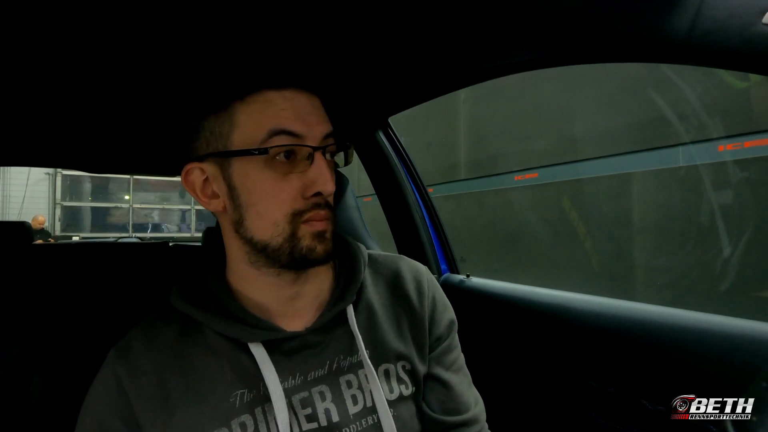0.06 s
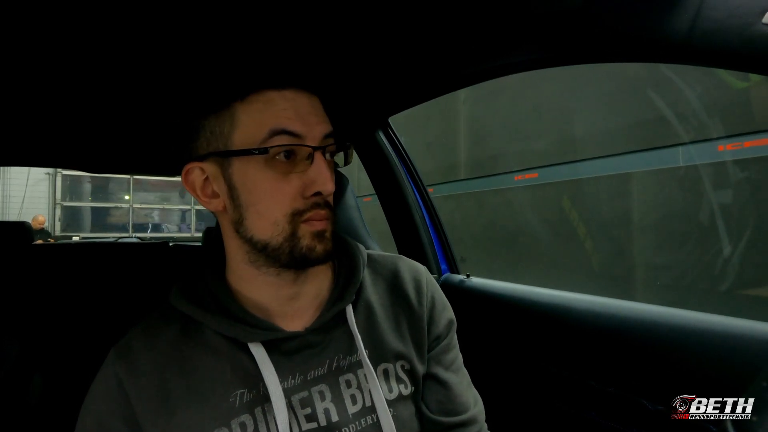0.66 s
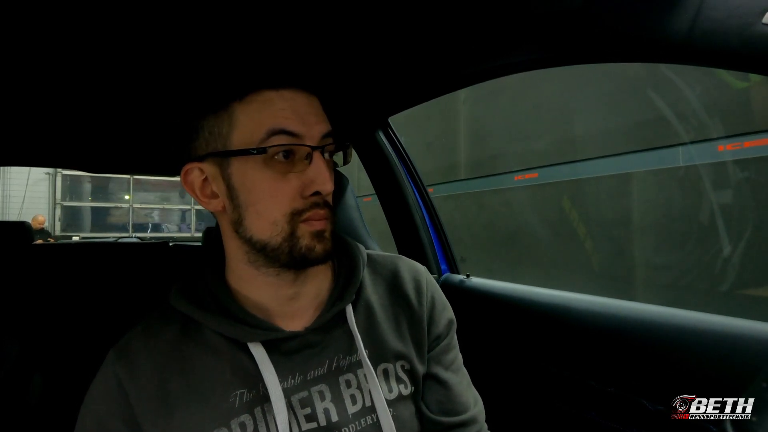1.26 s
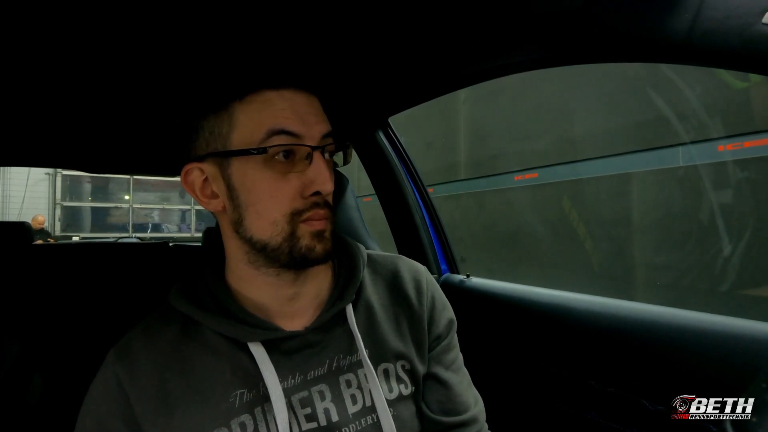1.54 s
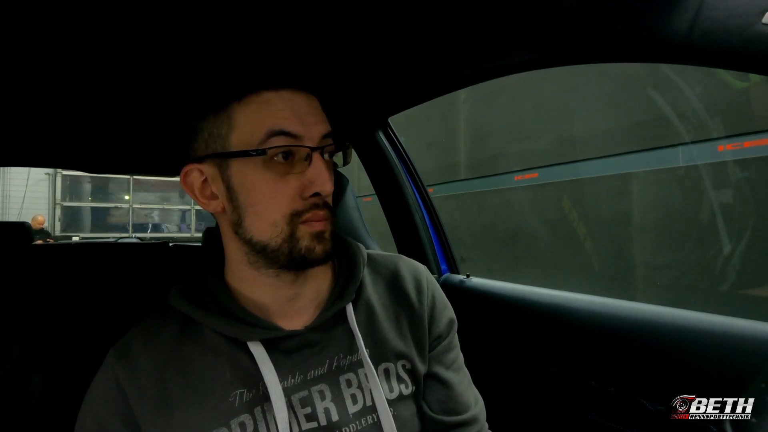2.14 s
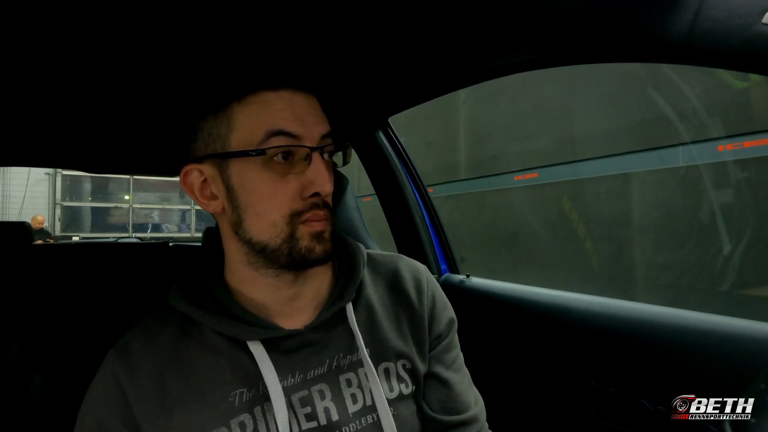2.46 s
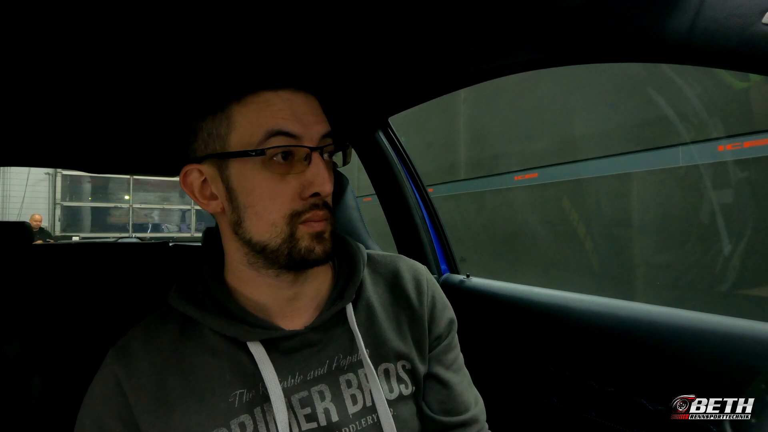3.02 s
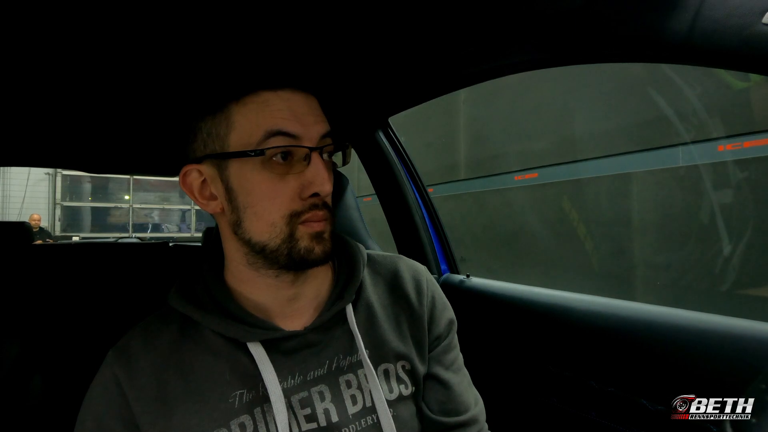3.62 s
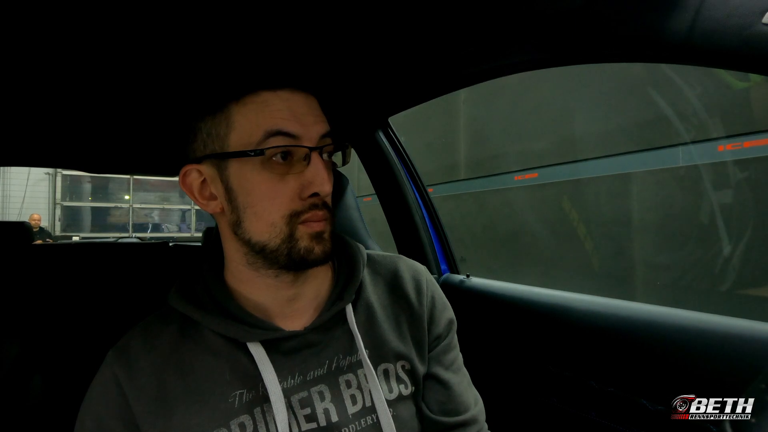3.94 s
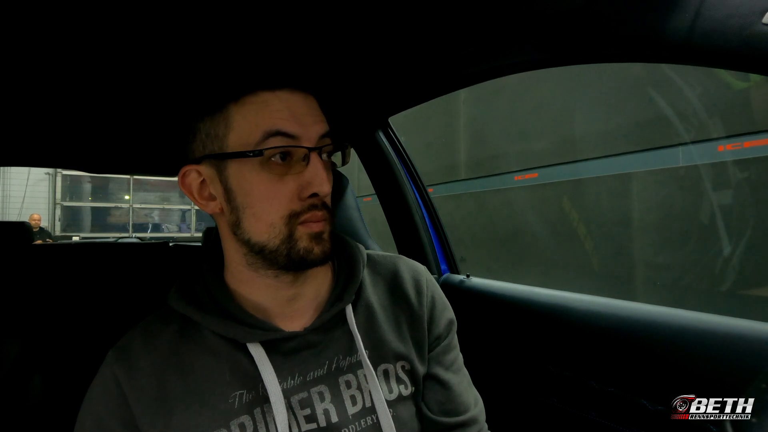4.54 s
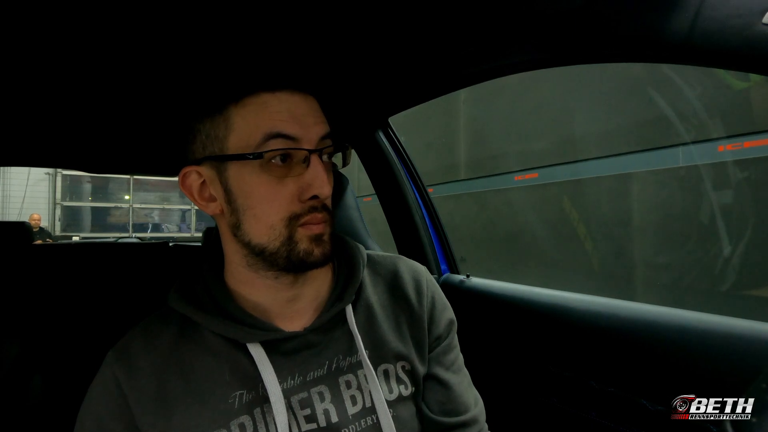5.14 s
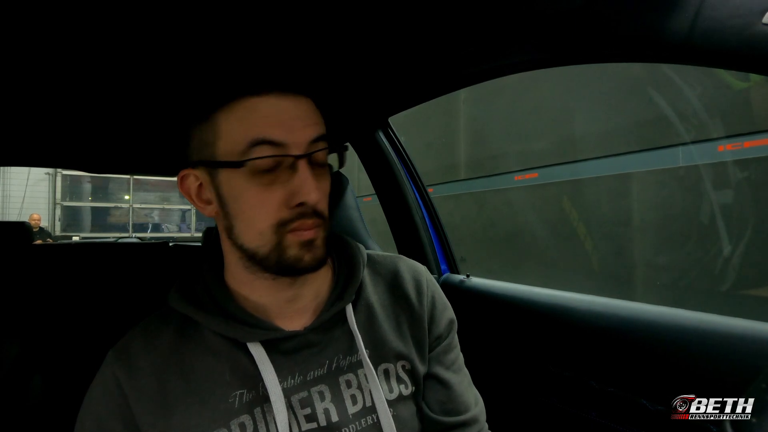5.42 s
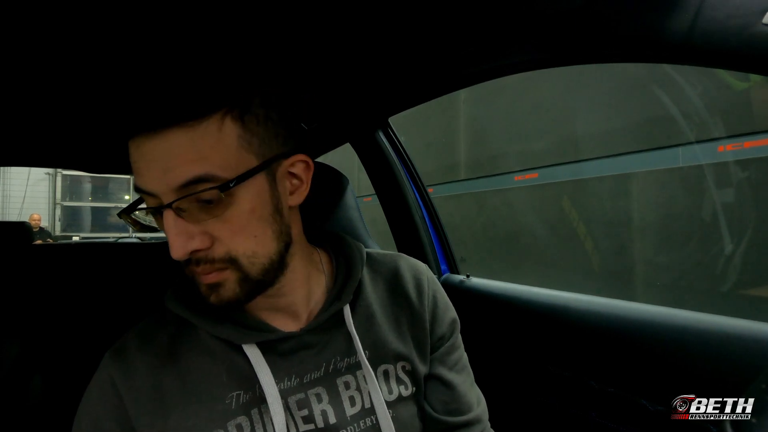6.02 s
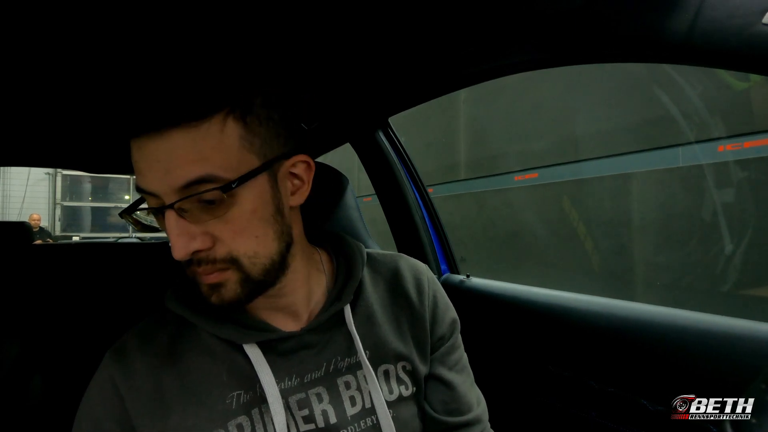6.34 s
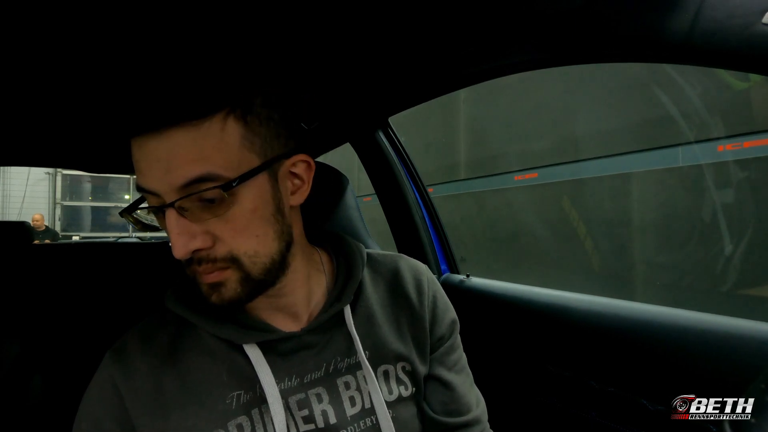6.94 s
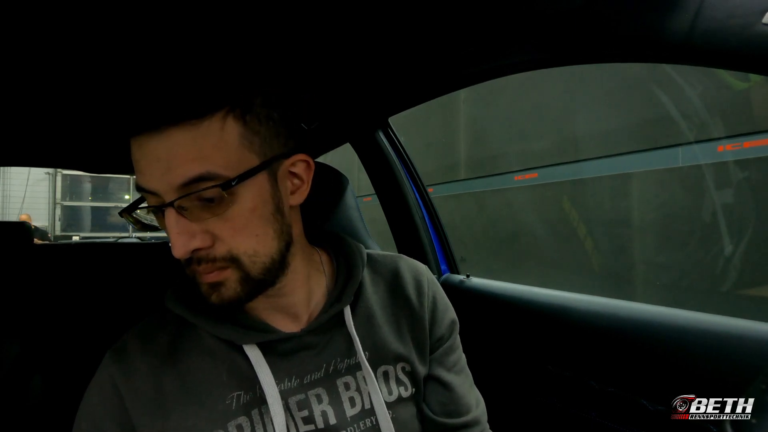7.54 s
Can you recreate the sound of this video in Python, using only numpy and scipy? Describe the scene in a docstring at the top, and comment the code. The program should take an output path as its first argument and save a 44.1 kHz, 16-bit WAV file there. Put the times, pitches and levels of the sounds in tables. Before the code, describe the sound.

A turbocharged six-cylinder car engine runs on a dyno, heard from inside the closed cabin. During the first second and a half its deep drone rises slightly in pitch and settles. It then holds an even speed until about 4.6 seconds, with a thin gear whine, a light mechanical rasp and a low body rumble underneath. From 4.6 seconds the engine pulls under full load, climbing smoothly and ever faster in pitch. The exhaust note grows louder, booming and thinning in turn, with swells around 5.7, 6.2 and 7.1 seconds. The gear whine rises with it and fades after about 6 seconds. Intake hiss and rasp grow a little, with brief surges between 6.6 and 7.5 seconds. The engine is still climbing when the sound ends near 7.8 seconds.

```python
"""Turbo six on a dyno, from the cabin

A turbocharged six-cylinder engine gathers speed, holds for a few seconds, then climbs under full load
with a gear whining along. Its orders (multiples of the engine cycle rate) drop out as they sweep through
the nodes of test cell and closed cabin. The body rumbles throughout; near the top the intake air
hisses harder and a thin metal part buzzes."""
import sys
import numpy as np
from scipy.fft import rfft, irfft, next_fast_len
from scipy.io import wavfile
from scipy.ndimage import uniform_filter1d, minimum_filter1d, map_coordinates

SR = 44100
rng = np.random.default_rng(int(sys.argv[2]) if len(sys.argv) > 2 else 0)


def transcribe(signal):
    """Save signal, clipped to [-1, 1], as a 16-bit WAV file at the path in sys.argv[1]."""
    frames = np.atleast_2d(signal).T
    limited = np.clip(frames, -1, 1)
    pcm = np.round(limited * 32767).astype(np.int16)
    wavfile.write(sys.argv[1], SR, pcm)


N = 342657
TIME = np.arange(N) / SR
COARSE = TIME[::100]  # time grid for slow controls


def amp(db):
    """Decibels to gain."""
    return 10 ** (np.asarray(db) / 20)


def unit(x):
    """Scale to rms 1."""
    return x / np.sqrt(np.mean(np.abs(x) ** 2) + 1e-20)


def fader(points, t=TIME):
    """A level ride through (time_s, level_db) points, in dB at the times t."""
    return np.interp(t, *np.transpose(points))


def fine(slow):
    """A slow control at every sample."""
    return np.interp(TIME, COARSE, slow)


def wobble(rate_hz):
    """A smooth random curve, rate_hz knots a second."""
    return fine(map_coordinates(rng.standard_normal(1024), [COARSE * rate_hz], mode="mirror"))


def scatter(place):
    """A smooth random complex gain of rms about 1, new with each whole step of place."""
    real, imag = (map_coordinates(k, [place], mode="mirror") for k in rng.standard_normal((2, 1024)))
    return (real + 1j * imag) / np.sqrt(2)


def filtered(x, response):
    """x through a frequency response."""
    size = next_fast_len(N + SR // 4)
    return irfft(rfft(x, size) * response(np.fft.rfftfreq(size, 1 / SR)), size)[:N]


def coloured(x, spectrum):
    """x through an EQ of (freq_hz, gain_db) points, at rms 1."""
    hz, db = np.transpose(spectrum)
    return unit(filtered(x, lambda f: amp(np.interp(np.log(f + 1), np.log(hz), db, left=-120, right=-120))))


def resonant(x, modes):
    """x through (pitch_hz, width_hz, gain_db) resonances, at rms 1."""
    def peaks(f):
        return sum(amp(db) / (1 + ((f - hz) / (width / 2)) ** 2) for hz, width, db in modes)
    return unit(filtered(x, peaks))


START_HZ, HELD_HZ, SETTLE_S, SETTLE_SHAPE = 21.2, 25.33, .774, 1.12
RELEASE_S, CLIMB_HZ_PER_S, CLIMB_HZ_PER_S2 = 4.6, 2.62, .457
def speed():
    """Engine cycles (two crank turns) a second: eases up to the held speed, then the dyno lets it climb."""
    climb_s = np.maximum(COARSE - RELEASE_S, 0)
    short_hz = (HELD_HZ - START_HZ) * np.exp(-(COARSE / SETTLE_S) ** SETTLE_SHAPE)
    return HELD_HZ - short_hz + CLIMB_HZ_PER_S * climb_s + CLIMB_HZ_PER_S2 * climb_s ** 2


def cycle_angle(lag_s=0):
    """Angle of the engine cycle, heard lag_s late."""
    hz = fine(speed())
    return 2 * np.pi * (np.cumsum(hz) / SR - lag_s * hz)


def sweep():
    """How fast the speed changes: 0 held, 1 at the steepest."""
    slope = uniform_filter1d(np.abs(np.gradient(speed())), size=110)
    return fine(slope / slope.max())


def steady(width_hz=0.25):
    """1 at the held speed, 0 away from it."""
    return np.exp(-((speed() - HELD_HZ) / width_hz) ** 2)


def note(angle, order, smear, flutter_hz, gain):
    """One order at a slowly changing complex gain; the share smear of its power flutters."""
    share = np.interp(COARSE, TIME, np.clip(smear, 0, 1) * np.ones(N))
    slow = gain * (np.sqrt(1 - share) + np.sqrt(share) * scatter(COARSE * flutter_hz))
    phase = order * angle % (2 * np.pi)
    return np.sqrt(2) * (fine(slow.real) * np.cos(phase) - fine(slow.imag) * np.sin(phase))


# Dead spots where the standing waves of cell and cabin cancel: pitch_hz
ROOM_NODES = [134.5, 145.4, 179.8, 192.6, 205.4, 213, 219, 271.8, 287.7, 315.8, 324.7, 333.4, 344.6, 365,
              381, 405.5, 417, 442, 458.5, 470, 489, 532, 565, 587, 613, 639, 686]
def standing_waves(hz, depth_db=-29.5):
    """Complex gain of the room: a notch and a flip of phase at every node."""
    nodes = np.array(ROOM_NODES)[:, None]
    half_width_hz = 1.57 + 0.00099 * nodes
    detune = 1j * (hz - nodes) / half_width_hz
    return np.prod((detune + amp(depth_db)) / (detune + 1), axis=0)


def echoes(order, share, spacing_hz=9):
    """Wall echoes add up differently at each frequency, so an order swells and fades as its pitch moves."""
    share = np.clip(share, 0, 1) * (1 - steady())
    return np.sqrt(1 - share) + np.sqrt(share) * scatter(order * speed() / spacing_hz)


EXHAUST_LAG_S, DISPERSION_RAD = .042, .03  # trip to the cabin; extra phase lag per order squared
def throb(order):
    """A weak cylinder leaves a gap in each cycle, where the in-between orders oppose the firing ones."""
    sign = -1 if order % 6 else 1
    return sign * np.exp(-1j * DISPERSION_RAD * order ** 2)


def strong_order(levels, angle, order, smear, echo_share=0):
    """A leading exhaust note on its way through the standing waves and echoes."""
    held_phase = np.angle(standing_waves(order * HELD_HZ))
    room = standing_waves(order * speed()) * np.exp(-1j * held_phase) * echoes(order, echo_share)
    gain = amp(fader(levels, COARSE)) * room * throb(order)
    return note(angle, order, smear, flutter_hz=24, gain=gain)


# Fader rides, ahead of the room, for the firing note, its overtones and a beating order: time_s, level_db
FIRING_RIDE = [(0, -20.5), (0.5, -20.5), (0.88, -17.5), (1.1, -25), (1.5, -26), (2.3, -24.0), (3, -21.5),
               (4.6, -22.5), (5.2, -21), (5.5, -24.0), (5.68, -13), (5.95, -21), (6.15, -10), (6.45, -17),
               (6.75, -15), (7.15, -12.5), (7.35, -15.0), (7.77, -16.5)]
OCTAVE_RIDE = [(0, -15.5), (.3, -18.5), (.6, -28), (.85, -23), (1, -22), (2.5, -22), (2.9, -39),
               (4.58, -39), (4.72, -22.5), (5.1, -19), (5.33, -13.5), (5.55, -15.5), (6.05, -17.5),
               (6.35, -12), (6.8, -19.5), (7.08, -21.5), (7.22, -16.5), (7.5, -19.5), (7.77, -16.5)]
TWELFTH_RIDE = [(0, -20), (0.3, -26), (0.65, -21.5), (1.1, -21), (1.7, -20.5), (2.2, -26.5), (2.8, -38),
                (4.6, -29.5), (5.05, -25), (5.5, -32), (6.05, -26.5), (6.3, -21.5), (6.6, -29),
                (6.9, -26.5), (7.1, -26), (7.3, -24.5), (7.55, -21), (7.77, -39)]
DOUBLE_OCTAVE_RIDE = [(0, -29), (0.35, -41), (0.75, -23.5), (1, -43), (1.25, -27.5), (1.65, -49.5),
                      (1.95, -30.5), (2.3, -28.0), (3, -44), (3.7, -46.5), (4.1, -31), (4.45, -52),
                      (5.3, -33), (6, -34), (6.5, -40), (7.1, -36.5), (7.4, -36.5), (7.77, -46.5)]
BEAT_RIDE = [(0, -43.5), (0.25, -32), (0.5, -29), (1, -25), (1.5, -23.5), (2.3, -21), (3.2, -26),
             (4.2, -30), (4.7, -25.5), (5.15, -24), (5.7, -21.0), (6.1, -27), (6.4, -28.5), (6.7, -25),
             (7.05, -19), (7.25, -30.5), (7.77, -29)]
def exhaust():
    """Six firings a cycle and their overtones, arriving late by way of the cell walls."""
    angle, moving = cycle_angle(EXHAUST_LAG_S), sweep() ** 0.6
    return (strong_order(FIRING_RIDE, angle, order=6, smear=.003)
            + strong_order(OCTAVE_RIDE, angle, order=12, smear=.004 + .037 * moving)
            + strong_order(TWELFTH_RIDE, angle, order=18, smear=.006 + .2 * moving, echo_share=.027)
            + strong_order(DOUBLE_OCTAVE_RIDE, angle, order=24, smear=.015 + .17 * moving, echo_share=.14)
            + strong_order(BEAT_RIDE, angle, order=13, smear=.0043 + .035 * moving, echo_share=.02))


# Fader rides for the growl, ahead of the room: time_s, level_db
LOW_GROWL_RIDE = [(0, -44), (0.5, -34), (1.1, -38.5), (1.6, -34.5), (4.6, -36.0), (5.4, -42), (5.95, -27),
                  (6.3, -35), (6.7, -34.5), (7, -17), (7.3, -33), (7.77, -35)]
MID_GROWL_RIDE = [(0, -35.5), (0.4, -24), (0.8, -31.5), (1.4, -35.5), (1.8, -26.5), (2.7, -29.5),
                  (4.55, -27.0), (5.1, -33.0), (5.6, -36.0), (6.05, -25), (6.45, -37.5), (6.9, -28.0),
                  (7.4, -31.5), (7.77, -43.0)]
HIGH_GROWL_RIDE = [(0, -36), (0.5, -45), (0.8, -47), (1.15, -33.5), (1.5, -30.5), (2, -47.5), (4.6, -43.0),
                   (5.1, -48.5), (5.8, -39.5), (6.5, -47.0), (7.1, -46.5), (7.77, -45)]
def growl():
    """Three orders that flank the firing harmonics beat against them once a cycle."""
    angle, smear = cycle_angle(EXHAUST_LAG_S), .01 + .084 * sweep()
    return (strong_order(LOW_GROWL_RIDE, angle, order=11, smear=smear)
            + strong_order(MID_GROWL_RIDE, angle, order=19, smear=smear)
            + strong_order(HIGH_GROWL_RIDE, angle, order=23, smear=smear))


# Tone of the exhaust pipe: freq_hz, gain_db
PIPE_EQ = [(45.0, -19), (100.0, -23.5), (138.0, -35), (162.0, -32.5), (187.0, -22), (270.0, -27.0),
           (375.0, -20), (460.0, -20.5), (535.0, -33), (570.0, -23.5), (605.0, -33.5), (660.0, -24.5),
           (760.0, -46), (950.0, -48), (1150.0, -51.5), (1400.0, -60.5), (1900.0, -66)]
# Unequal cylinders fill in between the firing harmonics: orders_above_harmonic, gain_db
CYLINDER_IMBALANCE = [(0, 1), (1, -2), (2, -12), (3, -17.5), (4, -18), (5, -7.5)]
# Cabin crests and troughs, where a passing order booms or thins: pitch_hz, width_hz, lift_db
CABIN_CRESTS = [(49.7, 1, 2.5), (165, 1.3, -12.5), (171.6, 1.2, 4), (181.4, 2.5, 7), (194, 1.8, -5),
                (212.3, 1.7, 8.5), (240, 11, -4.5), (259, 2.7, 4.5), (342, 10, 5.5), (348, 2.8, 3),
                (380.4, 4.3, 5.5), (412, 18, -6.5), (481, 8.5, 4), (571.5, 5.3, 4), (588, 3.6, -10),
                (598, 5.8, 9.5), (623, 5.7, -8.5), (638.3, 3.2, 7.5)]
# Balance the standing waves give at the held speed: order, relative_db
HELD_BALANCE = [(2, -29), (5, -32.5), (7, -35.5), (8, -47.5), (9, -41), (10, -38), (14, -30), (15, -46.5),
                (17, -29), (20, -35), (21, -48), (22, -48), (25, -32), (26, -36), (29, -40.5), (30, -48),
                (31, -57), (32, -45.5), (35, -50), (36, -48.5), (37, -55.5), (38, -48.5), (41, -47.5),
                (42, -51.5), (43, -60), (44, -50.5), (47, -45.5)]
LOAD_DB_PER_HZ, LOAD_ORDER = 0.4157, 21  # brightening with speed at this order, in proportion at others
def burble():
    """The weaker orders: steady at the held speed, swelling and fading through the room as it sweeps."""
    angle, smear = cycle_angle(EXHAUST_LAG_S), .026 + .15 * sweep()
    cycle_hz, holding = speed(), steady()
    held_db = {round(order): db for order, db in HELD_BALANCE}
    pipe_hz, pipe_db = np.transpose(PIPE_EQ)
    out = np.zeros(N)
    for order in range(2, 49):
        if order in (6, 11, 12, 13, 18, 19, 23, 24, 34):  # played by exhaust, growl and gear
            continue
        hz = order * cycle_hz
        tone_db = np.interp(np.log(hz), np.log(pipe_hz), pipe_db)
        uneven_db = CYLINDER_IMBALANCE[order % 6][1] / (1 + (order / 150) ** 2)
        load_db = LOAD_DB_PER_HZ * (cycle_hz - HELD_HZ) * order / LOAD_ORDER
        crest_db = sum(db * np.exp(-((hz - centre) / width) ** 2) for centre, width, db in CABIN_CRESTS)
        gain = amp(tone_db + uneven_db + load_db + crest_db) * np.abs(standing_waves(hz))
        if order in held_db:
            gain = gain + holding * (amp(held_db[order]) - gain)
        walls = echoes(order, share=(order / 30.6) ** 2.8)  # high orders sweep as pure echo
        phase_slip = np.exp(0.93j * rng.standard_normal())
        out += note(angle, order, smear, flutter_hz=18, gain=gain * walls * throb(order) * phase_slip)
    return amp(-2 - 0.5 * sweep()) * out


# Fader ride for the whine: time_s, level_db
WHINE_RIDE = [(0, -27.5), (0.25, -36.5), (0.419, -32), (0.851, -38), (1.12, -36), (1.71, -28),
              (2.86, -24.5), (4.88, -24), (5.32, -36), (5.699, -25), (6.2, -37), (6.45, -49), (7.05, -42.5),
              (7.77, -42)]
def gear_whine():
    """A whine at 17 times crank speed, like a meshing gear, comes straight through the body."""
    level_db = fader(WHINE_RIDE, COARSE)
    echo_share = np.minimum(amp(-50 - level_db) ** 2, .45)  # echoes make it waver where it fades
    gain = amp(level_db) * echoes(order=34, share=echo_share)
    return note(cycle_angle(), order=34, smear=.0074 + .01 * sweep(), flutter_hz=28, gain=gain)


def knocks(angle, spread_db):
    """A clatter that repeats every engine cycle: many faint lines of uneven strength."""
    orders = np.arange(48, 170)
    turn = np.linspace(0, 2 * np.pi, 4096)
    phases = rng.uniform(0, 2 * np.pi, len(orders))
    strengths = amp(rng.uniform(-spread_db, spread_db, len(orders)))
    cycle = np.cos(np.outer(turn, orders) + phases) @ strengths
    return np.interp(angle % (2 * np.pi), turn, cycle)


# Fader ride for the hiss, which the combustion rasp follows too: time_s, level_db
AIR_RIDE = [(0, -58.5), (.55, -54.5), (2.3, -55), (3.1, -53), (4.2, -53.5), (5.6, -52), (5.82, -54.5),
            (6.1, -51), (6.38, -54.5), (6.7, -53.5), (7.77, -49.5)]
# Bright tone of air and valves: freq_hz, gain_db
HISS_EQ = [(1200, -41), (2300, -1.5), (2900, -4), (3500, 0.5), (3950, -2.5), (4250, -8), (5000, -11.5),
           (5700, -14.5), (6300, -16), (7500, -21), (9500, -28.5), (12000, -35), (15500, -29)]
# Ring of the intake pipe: pitch_hz, width_hz, gain_db
DUCT_MODES = [(2300, 540, -0.5), (3900, 430, 4), (4850, 1100, -7.5), (6200, 420, -16)]
def intake(rush_db_per_hz=1.0):
    """Air hisses into the turbo over ticking valves; at high flow the pipe's resonances stand out."""
    valves = amp(-9) * (1 - sweep()) * coloured(knocks(cycle_angle(), spread_db=12.5), HISS_EQ)
    hiss_db = fader(AIR_RIDE) + 0.63 * noise_swell() + 0.89 * wobble(rate_hz=30)
    hiss = coloured(rng.standard_normal(N), HISS_EQ)
    rush_db = -64.5 + rush_db_per_hz * (fine(speed()) - HELD_HZ) + 1.1 * noise_swell()
    rush = resonant(rng.standard_normal(N), DUCT_MODES)
    return amp(hiss_db) * (hiss + valves) + amp(rush_db) * rush


# Midrange bite and darker roar of the burning gas: freq_hz, gain_db
RASP_EQ = [(500, -27.5), (900, 3.5), (1250, 2), (1450, -2), (1800, -8), (2050, -12), (2400, -17),
           (3000, -19.5), (5000, -38.5)]
ROAR_EQ = [(100, -26.5), (230, -13), (330, -0.5), (440, -5), (540, -8.5), (680, -6), (820, -11.5),
           (980, -14.5), (1200, -27.5), (2000, -54.5)]
def combustion(clatter_share=0.27, puff_depth=0.14, gather_db_per_hz=1):
    """Gas noise puffs with every firing, mixed with the engine's clatter."""
    angle = cycle_angle(lag_s=.03)
    puffs = 1 + puff_depth * np.cos(6 * angle)
    clatter = coloured(knocks(angle, spread_db=11.5), RASP_EQ)
    gas = coloured(puffs * rng.standard_normal(N), RASP_EQ)
    share = np.clip(clatter_share * (1 - sweep()), 0, 1)
    rasp = np.sqrt(share) * clatter + np.sqrt(1 - share) * gas
    short_hz = fine(np.maximum(HELD_HZ - speed(), 0))  # raspier while short of the held speed
    rasp_db = fader(AIR_RIDE) + noise_swell() + 12.5 + gather_db_per_hz * short_hz
    roar_db = -30.5 + 0.2 * sweep() + 0.66 * wobble(rate_hz=5)
    roar = coloured(puffs * rng.standard_normal(N), ROAR_EQ)
    return amp(rasp_db) * rasp + amp(roar_db) * roar


# Partials of the shaft's hum: harmonic, level_db, sweep_lift_db
SHAFT_PARTIALS = [(1, -44, 7.5), (2, -36, -4), (3, -52.5, 1.5), (4, -47.5, -9)]
def drive_shaft(turns_per_cycle=1.186):
    """The drive shaft's hum beats against the crank's."""
    angle, moving = turns_per_cycle * cycle_angle(), sweep()[::100]
    return sum(note(angle, round(harmonic), smear=.06, flutter_hz=9, gain=amp(db + lift_db * moving))
               for harmonic, db, lift_db in SHAFT_PARTIALS)


# Boom of the cabin: pitch_hz, width_hz, gain_db
CABIN_MODES = [(96, 10, -4), (138, 34, 2.5), (194, 32, -8.5), (866, 100, -13)]
# Fader ride for the rumble: time_s, level_db
RUMBLE_RIDE = [(0, -46), (.55, -31), (1.2, -35), (1.9, -32.5), (2.8, -28.5), (4.4, -34.5), (5.8, -29),
               (6.5, -28), (7.1, -31.5), (7.77, -34.5)]
# Low-end weight of the body: freq_hz, gain_db
RUMBLE_EQ = [(8, -3.5), (20, 0), (40, 4.5), (58, 0.5), (75, -10), (105, 7.5), (135, -4), (230, -4),
             (400, -46)]
def body_rumble():
    """The body shakes on its mounts and booms as the speed sweeps."""
    boom = amp(-33) * sweep() * resonant(rng.standard_normal(N), CABIN_MODES)
    shake = amp(fader(RUMBLE_RIDE)) * coloured(rng.standard_normal(N), RUMBLE_EQ)
    return boom + shake


# Faint spells of buzz: peak_s, half_length_s, level_db
SIZZLE_SPELLS = [(5.58, .03, -91), (5.912, 0.048, -89), (6.07, .04, -90), (6.66, .08, -81.5),
                 (6.88, .08, -86), (7.11, .05, -85), (7.42, .08, -84), (7.53, .035, -81), (7.69, .1, -86)]
# Ring of the thin metal: pitch_hz, width_hz, gain_db
METAL_MODE = [(10170, 170, 0)]
def sizzle():
    """A thin metal part buzzes in short spells near the top of the pull, shaken once a crank turn."""
    spells = fine(sum(amp(db) * np.exp(-((COARSE - s) / half) ** 2) for s, half, db in SIZZLE_SPELLS))
    shaking = 1 + np.cos(2 * cycle_angle())
    return spells * resonant(shaking * rng.standard_normal(N), METAL_MODE)


# Brief swells of hiss and rasp where the loud engine notes drop out: peak_s, half_length_s, lift_db
NOISE_SWELLS = [(5.956, 0.043, 2.5), (6.618, 0.052, 5.5), (6.867, 0.1, 5.5), (7.1, 0.072, 6),
                (7.464, 0.068, 2.5)]
def noise_swell():
    """A lift in dB at set moments, which hiss, rush and rasp each follow by their own amount."""
    return fine(sum(db * np.exp(-((COARSE - s) / half) ** 2) for s, half, db in NOISE_SWELLS))


def scene():
    """Everything meets in the cabin, in mono."""
    engine = exhaust() + growl() + burble() + gear_whine() + combustion() + intake()
    return (engine + drive_shaft() + body_rumble() + sizzle())[None]


KNEE_DB, SQUEEZE, REACT_S = -17, 0.53, 0.035  # SQUEEZE: share of the excess dB removed
CEILING, TOP_HZ = .5, 15800
def record(dry):
    """A compressor ducks the mix under loud notes, a limiter holds the peaks, a low-pass trims the top."""
    power = np.abs(uniform_filter1d(dry[0] ** 2, size=round(REACT_S * SR)))
    excess = np.maximum(np.sqrt(power) / amp(KNEE_DB), 1)
    ducked = dry[0] / excess ** SQUEEZE
    needed = CEILING / np.maximum(np.abs(ducked), CEILING)
    limiter = uniform_filter1d(minimum_filter1d(needed, size=600), size=600)
    return filtered(ducked * limiter, lambda hz: hz < TOP_HZ)[None]


dry = scene()
out = record(dry)
transcribe(out)
```